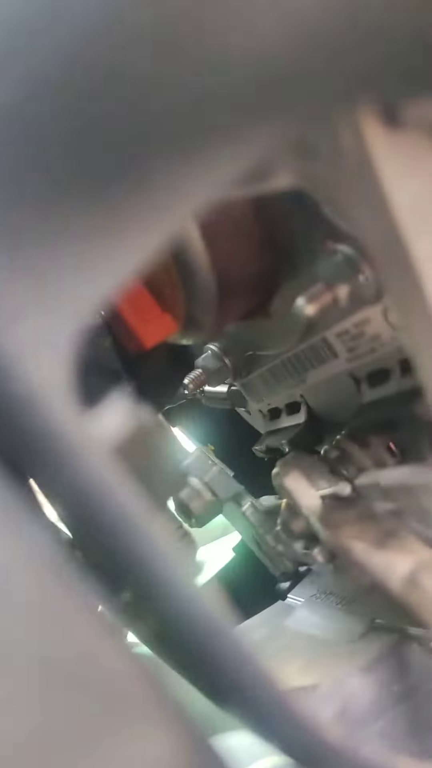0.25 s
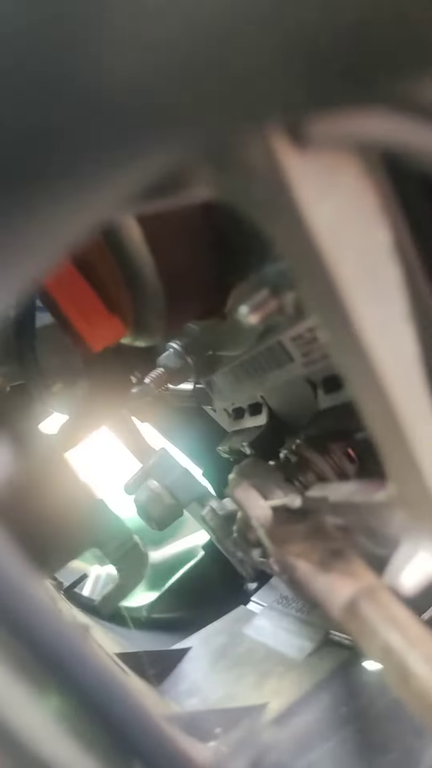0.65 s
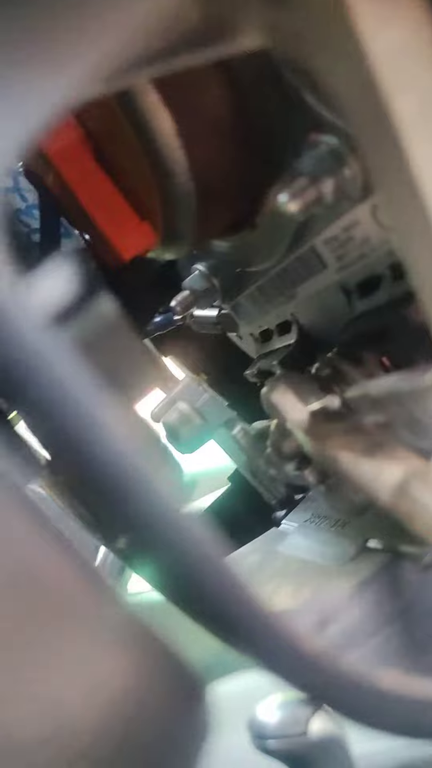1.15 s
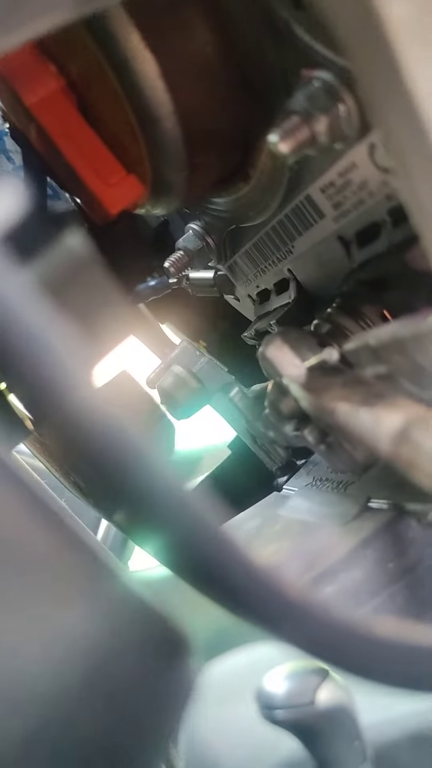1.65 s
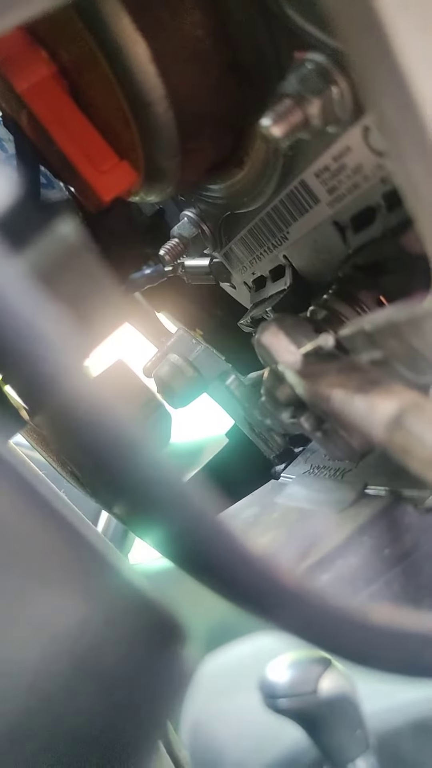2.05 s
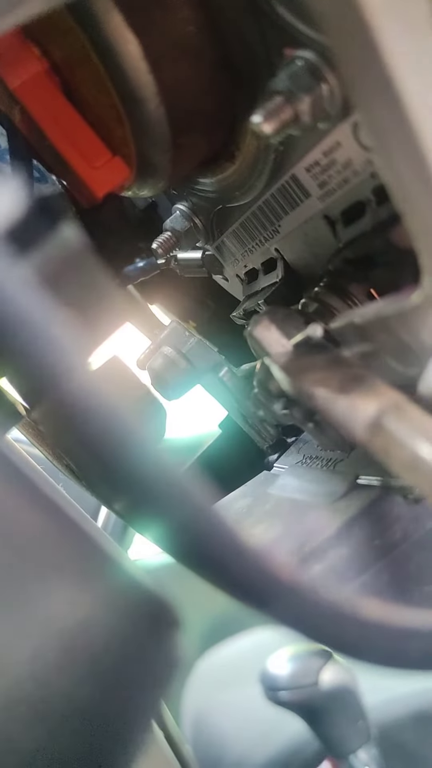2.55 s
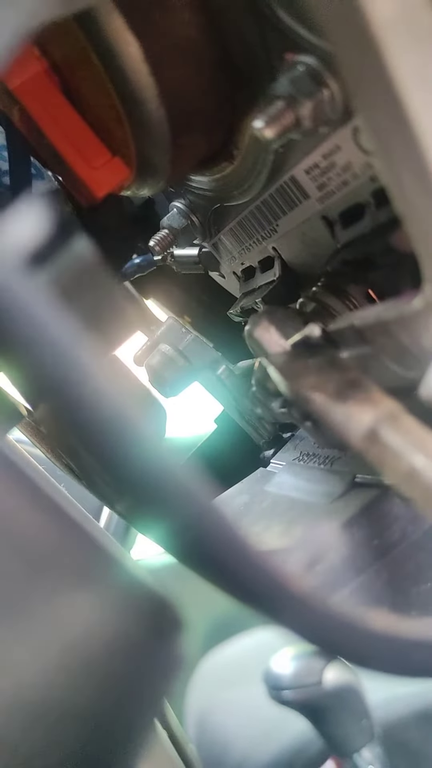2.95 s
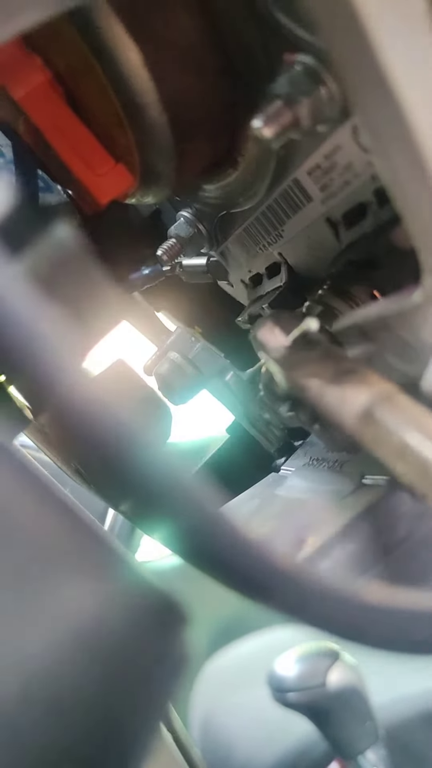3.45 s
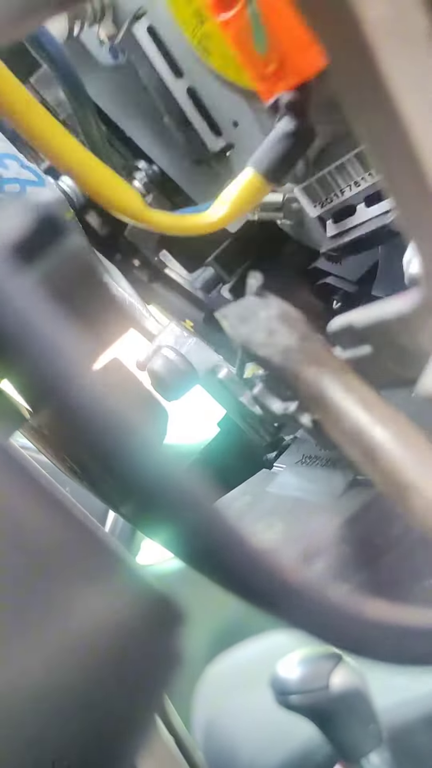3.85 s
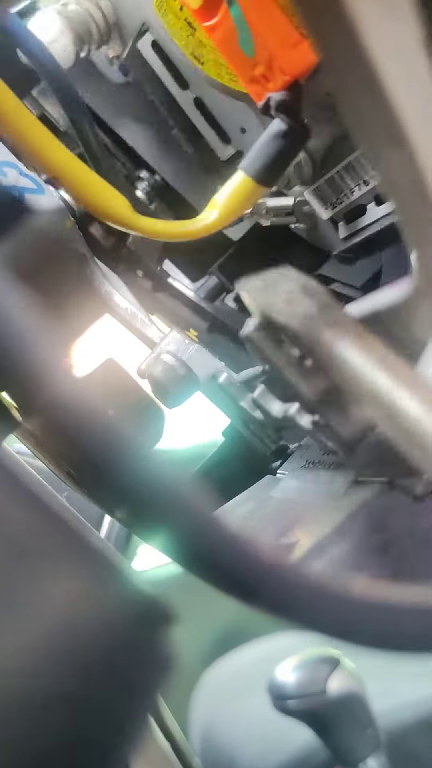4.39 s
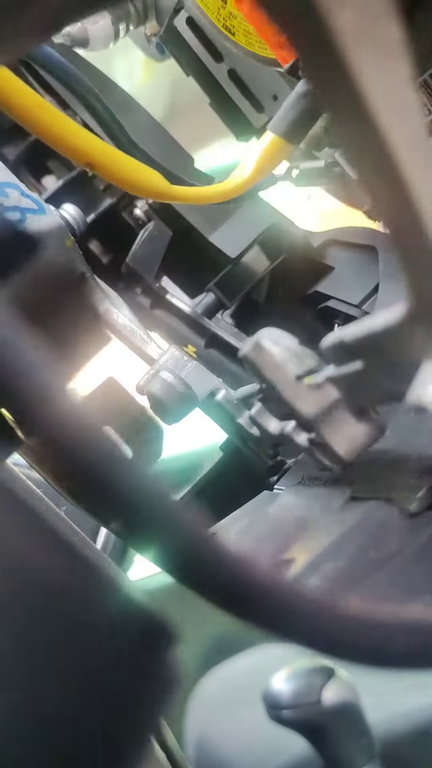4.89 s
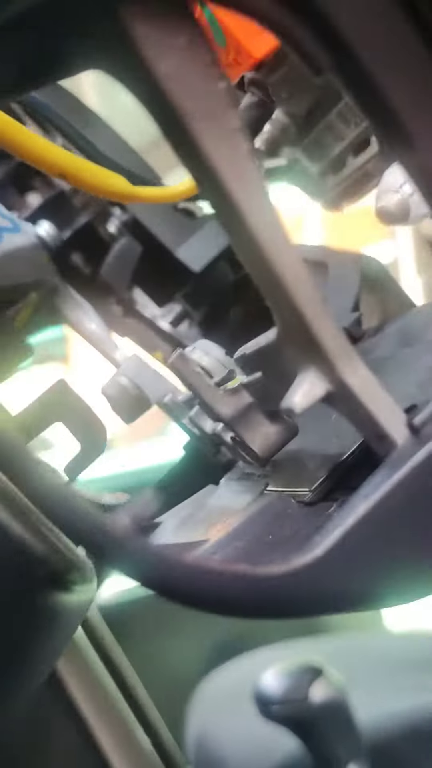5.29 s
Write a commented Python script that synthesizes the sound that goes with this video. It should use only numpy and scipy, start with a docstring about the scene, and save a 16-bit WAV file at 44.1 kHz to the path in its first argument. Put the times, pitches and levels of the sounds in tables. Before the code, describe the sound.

A screwdriver works at spring clips behind a dashboard, very near the microphone. The first half is sparse: handling rubs and taps, then delicate ticks over a quiet idle rumble. Later a knock, a loud hollow double pop with panel shudder, metallic scrapes, and the loudest event, a springy steel snap with rebound. Short chirps and a grainy, catching slide end it, in a dull cabin with very little echo.

```python
"""Car cabin, small and dead: a flat screwdriver pries at spring clips behind the dashboard, near a camera.
The blade ticks, levers one clip loose, scrapes along, snaps a second one free and is drawn out.
Contacts are blows and micro-slips ringing a part's resonances; slides are grainy friction noise.
An idling engine and a second low hum are sines; rumble, rush and hiss are shaped noise."""
import sys
import numpy as np
from scipy import signal
from scipy.fft import rfft, irfft, next_fast_len
from scipy.io import wavfile
from scipy.ndimage import uniform_filter1d, map_coordinates

SR = 44100
rng = np.random.default_rng(int(sys.argv[2]) if len(sys.argv) > 2 else 0)


def dump_mix(stems):
    """Bounce the given channels to the path in sys.argv[1] as a 16-bit WAV at rate SR."""
    frames = np.atleast_2d(stems).T  # one column per channel
    limited = np.clip(frames, -1, 1)  # hard clip at full scale
    pcm = np.round(limited * 32767).astype(np.int16)
    wavfile.write(sys.argv[1], SR, pcm)


N = 243696
TIME = np.arange(N) / SR

# In all contact tables, hardness adds treble and takes away body.
# lever gives way against the plastic trim: start_s, level_db, hardness_db
POPS = [(3.8629, -8, -0.94), (3.8695, -9, 0.2)]
# steel clip springs free and rebounds: start_s, level_db, hardness_db
SNAPS = [(4.4627, -3.5, -1), (4.4668, -9.5, 1.5), (4.4787, -8.5, 0.5)]
# friction spectrum of the sliding blade: freq_hz, relative_db (per Hz)
SCRAPE = [(80, 12), (300, 4), (900, 1.5), (1300, -4), (2000, -4.5), (3000, -8), (4500, -17.5),
          (8000, -16.5), (10000, -28), (16000, -37)]


def amp(db):
    """Decibels to gain."""
    return 10 ** (np.asarray(db) / 20)


def unit(x):
    """Scale to rms 1."""
    return x / np.sqrt(np.mean(x ** 2) + 1e-20)


def along(points, hz):
    """Interpolate (Hz, value) points on a log frequency axis."""
    f, v = np.transpose(points)
    return np.interp(np.log(hz + 1), np.log(f + 1), v)


def curves(rows):
    """One value per sample for each column after the time."""
    s, *cols = np.transpose(rows)
    return [np.interp(TIME, s, c) for c in cols]


def wobble(rate_hz):
    """A smooth random curve with rate_hz knots a second."""
    knots = rng.standard_normal(int(N * rate_hz / SR) + 4)
    return map_coordinates(knots, [TIME * rate_hz])


def filtered(x, response):
    """Filter x by a complex response of frequency."""
    m = next_fast_len(N + SR // 2)
    hz = np.fft.rfftfreq(m, 1 / SR)
    return irfft(rfft(x, m) * response(hz), m)[..., :N]


def causal(db):
    """The minimum-phase response with these gains: nothing sounds before its cause."""
    cepstrum = irfft(np.log(amp(db)))
    half = cepstrum.shape[-1] // 2
    cepstrum[..., 1:half] *= 2
    cepstrum[..., half + 1:] = 0
    return np.exp(rfft(cepstrum))


def noise(spectrum, apart):
    """Coloured stereo noise of rms 1; apart is the size of the side against the mid."""
    white = rng.standard_normal((2, N))
    mid, side = filtered(white, lambda hz: amp(along(spectrum, hz)))
    return unit(np.array([mid + apart * side, mid - apart * side]))


def swell(start_s, length_s):
    """A rounded pressure pulse."""
    progress = np.clip((TIME - start_s) / length_s, 0, 1)
    return np.sqrt(np.abs(np.sin(np.pi * progress))) * (TIME < start_s + length_s)


def add(out, start_s, sound):
    """Mix a sound in at start_s."""
    part = out[:, max(round(start_s * SR), 0):][:, :sound.shape[1]]
    part += sound[:, :part.shape[1]]


def ringing(modes, hz, damping):
    """Resonances at each port: their strengths change at random with the spot that is struck."""
    centre, width, db = np.transpose(modes)[:, :, None]
    loss = 1j * hz * width * damping
    shapes = loss / (centre * centre - hz * hz + loss)
    spot = amp(rng.normal(0, 3.6, (2, len(modes))))
    return spot @ (amp(db) * shapes)


def contacts(rows, modes, t60_s, pan_db, lean, ring_db, damping, rise_s, spike, rough_db,
             thud_db, knock_db, bright_db, top_db, bass_db):
    """Each contact is a sharp blow and a dying train of micro-slips that ring the part."""
    out, size = np.zeros((2, N)), 8192
    t, hz = np.arange(size) / SR, np.fft.rfftfreq(size, 1 / SR)
    grip = (1 - np.exp(-t / rise_s)) * amp(-60 * t / t60_s)
    for start_s, level_db, hardness_db in rows:
        lumps = unit(uniform_filter1d(rng.standard_normal(size), 30))
        slips = rng.standard_normal((2, size)) * grip * amp(rough_db * lumps)
        force = slips / np.linalg.norm(slips, axis=1, keepdims=True)
        force[:, 8] += spike  # the blow
        push = rfft(force)
        # long waves reach both ports alike, the right one a little later
        alike = 1 / (1 + (hz / 1400) ** 2)
        right = alike * push[0] + np.sqrt(1 - alike ** 2) * push[1]
        push[1] = right * np.exp(-2j * np.pi * hz * 0.00042)
        body = 1 + amp(ring_db) * ringing(modes, hz, damping)
        body /= np.sqrt(np.mean(np.abs(body[:, hz < SR / 8]) ** 2))
        # a harder contact gains treble and loses lean times as much thud and knock
        low = thud_db - lean * hardness_db
        mid = knock_db - lean * hardness_db
        high = bright_db + hardness_db
        colour = [(25, low + bass_db - 31), (100, low + bass_db), (220, low), (330, low),
                  (600, mid), (1100, mid), (1900, -1.4), (3200, 0.94), (5200, high), (8300, high),
                  (10000, high + top_db), (15000, high + top_db)]
        click = irfft(push * body * causal(along(colour, hz)))
        # undo the dilution of the force over the train's length
        gain = np.sqrt(t60_s * SR / np.log(1e6) / (1 + spike ** 2))
        add(out, start_s, click * amp(level_db) * gain)
    return out * amp([[pan_db / 2], [-pan_db / 2]])


def stutter(start_s, length_s, level_db, count):
    """Stick-slip: contacts at an uneven pace, each with its own strength and hardness."""
    times = start_s + length_s * (np.arange(count) + rng.uniform(size=count)) / count
    scatter_db = 1.8 * rng.standard_normal((count, 2))
    return [(s, level_db + louder, harder) for s, (louder, harder) in zip(times, scatter_db)]


def stroking(rows, spectrum, grain_db, lump_db):
    """Sliding friction catches on grain after grain, in lumps."""
    pressure = sum(amp(db) * swell(s, length) for s, length, db in rows)
    catching = amp(grain_db * wobble(450) + lump_db * wobble(90))
    return pressure * unit(noise(spectrum, apart=0.99) * catching)


def engine():
    """The idle's firing rate holds, then sinks; its harmonics beat against a second low hum."""
    # level of the idle, before its random waver: time_s, level_db
    idle_level = [(0, -56.5), (1.5, -50), (1.9, -49), (2.4, -43), (3.03, -53), (3.3, -42), (3.75, -43),
                  (4.1, -39), (5.53, -39.5)]
    # harmonics of the firing rate: multiple, relative_db
    orders = [(1, 1.5), (2, -12.5), (3, -19), (4, -22)]
    # second hum: time_s, pitch_hz
    drone_pitch = [(0, 74.5), (1.1, 74), (1.8, 69), (3.7, 69.8), (4.8, 62), (5.53, 63.5)]
    # second hum, before its random waver: time_s, level_db
    drone_level = [(0, -52), (1.6, -57.5), (2.1, -43.5), (2.9, -49.5), (4.0, -39), (4.8, -53.5),
                   (5.53, -34)]
    idle_hz, sag_from_s, sag_hz_per_s = 50.53, 3.0, 2.2
    firing_hz = idle_hz - sag_hz_per_s * np.maximum(TIME - sag_from_s, 0)
    phase = 2 * np.pi * np.cumsum(firing_hz * (1 + 0.01087 * wobble(11))) / SR
    idle_db = curves(idle_level)[0] + 1.4 * wobble(7)
    idle = 0
    for k, db in orders:
        level = amp(idle_db + db + 0.47 * wobble(5.17))
        idle = idle + level * np.sin(k * phase + rng.uniform(0, 2 * np.pi))
    (drone_hz,), (drone_db,) = curves(drone_pitch), curves(drone_level)
    drone = amp(drone_db + wobble(3.42)) * np.sin(2 * np.pi * np.cumsum(drone_hz) / SR)
    return np.sqrt(2) * (idle + drone)  # levels are rms


def ambience():
    """Slowly wavering noise bands: rumble and a soft rush, over the microphones' own white hiss."""
    # cabin noise, before the offsets below: time_s, body_db, hiss_db
    air = [(0.0, -52.5, -62), (0.21, -56.5, -65), (1.72, -57, -66.5), (3.42, -54.5, -63.5),
           (4.89, -51, -57), (5.53, -50, -58.5)]
    # spectra: freq_hz, relative_db (per Hz)
    rumble_spectrum, body_spectrum, hiss_spectrum = [(15, 3.5), (30, -3), (55, -5), (105, 3), (150, -15.5),
                                                     (400, -35), (2000, -100)], [(40, 3.5), (130, -2), (300, 2),
                                                                     (480, -8), (750, -5.5), (1200, -17),
                                                                     (2000, -63), (6000, -51)], [(500, -2.5), (1300, -3),
                                                                                   (2400, -1.5),
                                                                                   (3800, -11), (6500, -18),
                                                                                   (8200, -10),
                                                                                   (10000, -26),
                                                                                   (16000, -33)]
    body_db, hiss_db = curves(air)
    rumble = amp(body_db + 4 + 3 * wobble(1.93)) * noise(rumble_spectrum, apart=0.28)
    body = amp(body_db + 0.32 + 0.75 * wobble(17)) * noise(body_spectrum, apart=0.49)
    hiss = amp(hiss_db + 0.75 + 0.71 * wobble(4.02)) * noise(hiss_spectrum, apart=1.0)
    mic_hiss = amp(-69) * rng.standard_normal((2, N))
    return rumble + body + hiss + mic_hiss


def blade_ticks():
    """Light contacts ring the blade against its clip."""
    # start_s, level_db, hardness_db
    ticks = [(0.2089, -40, 1), (0.6893, -44, -4), (1.0377, -30.5, -5), (1.0851, -29.5, 2),
             (1.1668, -42, -6), (1.7904, -58, -8), (2.3338, -45.5, 3), (2.6115, -33, -3),
             (2.6544, -44.5, 1), (3.5137, -44, 3), (3.6039, -34, -9.5), (3.696, -39.5, 11.5),
             (3.7174, -38, 13.5)]
    # blade resonances: freq_hz, width_hz (before damping), relative_db
    blade = [(717, 27, -4), (1067, 78, 2), (1690, 110, 4.5), (2740, 220, -7.5), (3950, 84, -34),
             (4800, 210, -12), (5220, 280, -27), (7570, 330, -1)]
    return contacts(ticks, blade, t60_s=0.023, pan_db=4.5, lean=0.68, ring_db=1.5, damping=1.2,
                    rise_s=0.0011, spike=0.7, rough_db=0.66,
                    thud_db=-3, knock_db=2.5, bright_db=-11.5, top_db=-9.5, bass_db=-3)


def handling():
    """Fingers rub the camera as soft friction, and dry taps ring its case, nearer to the left port."""
    # finger shifts: start_s, length_s, level_db
    shifts = [(.4375, 0.0054, -37.5), (0.443, 0.073, -46.5), (0.571, 0.051, -52), (0.791, 0.011, -49),
              (0.898, 0.014, -49)]
    # skin friction: freq_hz, relative_db (per Hz)
    skin = [(60, -23), (200, -6.5), (330, -1.5), (600, -9), (900, -25), (2500, -55), (9000, -70)]
    # dry knocks: start_s, level_db, hardness_db
    taps = [(0.6236, -23, -0.44), (0.6524, -14.5, 0)]
    # camera case resonances: freq_hz, width_hz (before damping), relative_db
    case = [(334, 230, -10), (830, 440, -0.5), (3030, 600, 5), (7800, 630, -19)]
    rubs = stroking(shifts, skin, grain_db=1, lump_db=1) * amp([[3], [-4]])
    return rubs + contacts(taps, case, t60_s=0.0043, pan_db=15.0, lean=1.2, ring_db=-1, damping=1,
                           rise_s=0.00039, spike=0.88, rough_db=2.2,
                           thud_db=11, knock_db=1, bright_db=-10.5, top_db=-17, bass_db=-2)


def seating_knock():
    """The blade seats itself behind the plastic housing, whose low modes ring."""
    # start_s, level_db, hardness_db
    knocks = [(3.3844, -19.5, 0)]
    # housing resonances: freq_hz, width_hz (before damping), relative_db
    housing = [(124.3, 46, -1), (207, 47, -1.5), (295, 69, 0.5), (1800, 130, 10), (2060, 99, -8),
               (3280, 170, -17)]
    return contacts(knocks, housing, t60_s=0.029, pan_db=8.0, lean=1, ring_db=7.5, damping=1.5,
                    rise_s=0.0005, spike=0.3, rough_db=1.5,
                    thud_db=9.5, knock_db=6, bright_db=-10.5, top_db=-10.5, bass_db=6)


def trim_pops():
    """The lever gives way and rings the plastic trim."""
    # trim resonances: freq_hz, width_hz (before damping), relative_db
    trim = [(280, 13, 1), (553, 28, -8), (733, 23, 11), (783, 31, 11.5), (970, 88, 2), (1070, 31, 1),
            (1780, 14, -11), (1900, 14, -15), (2780, 43, 8), (4640, 150, -4)]
    return contacts(POPS, trim, t60_s=0.035, pan_db=2.5, lean=4.5, ring_db=3.0, damping=1.4,
                    rise_s=0.00064, spike=0.47, rough_db=2.8,
                    thud_db=6, knock_db=0.0, bright_db=-6.5, top_db=-14, bass_db=5)


def trim_shudder(level_db=-19, panel_hz=103, sway_hz=58, t60_s=.22):
    """The whole panel swings in two decaying modes when the lever gives way."""
    t = np.maximum(TIME - POPS[0][0], 0)
    fade = amp(level_db - 60 * t / t60_s)
    return fade * (np.sin(2 * np.pi * panel_hz * t) + .5 * np.sin(2 * np.pi * sway_hz * t))


def blade_strokes():
    """The blade slides along as grainy friction."""
    # start_s, length_s, level_db
    strokes = [(3.868, 0.11, -37), (3.99, 0.128, -40), (4.44, 0.037, -42), (4.575, .115, -52.5),
               (4.694, 0.059, -45.5)]
    return stroking(strokes, SCRAPE, grain_db=1, lump_db=3.0)


def blade_skids():
    """The blade skids over edges, with a run of stick-slips, and rings the steel bracket."""
    # start_s, level_db, hardness_db
    skids = [(3.8989, -19, 3), (3.9316, -26, 2), (3.9748, -20.5, 9.5), (4.0155, -26.5, -5),
             (4.0368, -15.5, -1), (4.0733, -22.5, 5.5), (4.0924, -30, -8), (4.124, -35.5, 3.5),
             (4.333, -35, -4)]
    # bracket resonances: freq_hz, width_hz (before damping), relative_db
    bracket = [(520, 53, 4.5), (790, 19, -6), (1176, 140, -4), (1620, 93, -2.5), (1806, 56, 3),
               (2017, 17, -12), (2940, 50, -4), (4840, 120, -10), (7330, 140, -4), (8700, 320, 2)]
    run = stutter(start_s=4.035, length_s=.055, level_db=-36, count=5)
    return contacts(skids + run, bracket, t60_s=0.035, pan_db=2.5, lean=1.0, ring_db=4, damping=1.24,
                    rise_s=0.0018, spike=0.23, rough_db=4.6,
                    thud_db=-0.5, knock_db=-2, bright_db=-11.0, top_db=-14, bass_db=7)


def clip_snaps():
    """The steel clip springs free and rebounds, ringing brightly."""
    # clip resonances: freq_hz, width_hz (before damping), relative_db
    spring = [(1330, 15, -5), (2270, 79, 10), (2780, 93, 2), (3140, 63, -4), (4350, 140, -7),
              (4810, 230, -1.5), (5450, 170, -13), (6750, 56, -4.5), (7870, 290, 2), (8470, 130.3, -11),
              (14300, 170, -2)]
    return contacts(SNAPS, spring, t60_s=.015, pan_db=-2.0, lean=0.36, ring_db=6, damping=1.9,
                    rise_s=0.0011, spike=0.37, rough_db=1.7,
                    thud_db=-6.5, knock_db=0.0, bright_db=2.5, top_db=-8.5, bass_db=-14)


def port_thump(level_db=-4.5, decay_s=0.037, swing_hz=7.1, rise_s=0.0019):
    """The snap jolts the left microphone, far less the right: a swing out and a damped recovery."""
    t = np.maximum(TIME - SNAPS[0][0] - .001, 0)
    swing = (1 - np.exp(-t / rise_s)) * np.exp(-t / decay_s) * np.cos(2 * np.pi * swing_hz * t)
    return -amp([[level_db], [level_db - 21]]) * swing


def clip_settling():
    """The freed clip chatters to rest as short bursts of friction noise."""
    # start_s, length_s, level_db
    bursts = [(4.484, 0.019, -33.5), (4.49, 0.047, -44.5)]
    # freq_hz, relative_db (per Hz)
    chatter = [(300, -2.5), (900, -4.5), (1350, 1.5), (1800, -8), (2600, 0), (3500, -14), (5000, -13),
               (8000, -18), (10000, -32), (16000, -36)]
    return stroking(bursts, chatter, grain_db=-0.5, lump_db=0.5)


def squeaks():
    """Steel sticks on plastic: brief tones of jittering pitch, with friction grit."""
    # start_s, length_s, pitch_hz (before jitter), level_db
    rows = [(4.697, 0.0085, 2370, -42), (4.71, 0.011, 2357, -34.5), (4.723, 0.011, 2350, -36.5),
            (4.77, 0.013, 1480, -42.5)]
    out = np.zeros((2, N))
    grit = 0.68 * noise(SCRAPE, apart=0.99)
    for start_s, length_s, pitch_hz, level_db in rows:
        phase = 2 * np.pi * np.cumsum(pitch_hz * (1 + .03 * wobble(900))) / SR
        tone = np.sin(phase + np.array([[0], [1]]))  # right port 1 rad ahead
        out += amp(level_db) * swell(start_s, length_s) * (tone + grit)
    return out


def shaft_pull():
    """The shaft slides out past the trim as coarse-grained friction."""
    # start_s, length_s, level_db
    pulls = [(4.828, 0.155, -42.5), (4.856, 0.027, -45.5), (4.888, 0.061, -44)]
    # freq_hz, relative_db (per Hz)
    rasp = [(120, -18), (240, 12.5), (500, 4), (800, 7.5), (1150, -7), (1550, 4.5), (2100, -13),
            (3200, -14), (4700, -3.5), (6300, -14), (7800, -6.5), (10000, -24), (16000, -37)]
    return stroking(pulls, rasp, grain_db=6, lump_db=2.0)


def shaft_slips():
    """The shaft stutters and catches hard on the trim on its way out."""
    # hard catches: start_s, level_db, hardness_db
    catches = [(4.8888, -26, 0.018), (4.9187, -27, 0), (4.9691, -34, 0)]
    # shaft resonances: freq_hz, width_hz (before damping), relative_db
    shaft = [(1520, 61, -2), (2340, 44, -6), (2710, 44, 2.5), (3770, 110, -11), (4500, 150, -1.5),
             (7640, 85, -2)]
    run = stutter(start_s=4.858, length_s=.112, level_db=-37, count=10)
    return contacts(catches + run, shaft, t60_s=.03, pan_db=6.5, lean=0.91, ring_db=11.5, damping=0.87,
                    rise_s=0.0006, spike=0.2, rough_db=5.4,
                    thud_db=21, knock_db=11, bright_db=-13.0, top_db=-12, bass_db=-22)


def cabin(x):
    """The upholstered cabin answers with a short, dull tail of decaying noise."""
    # freq_hz, t60_s
    decay = [(100, 0.61), (700, 0.14), (2500, 0.07), (8000, 0.058), (15000, 0.013)]
    hz, t, z = signal.stft(rng.standard_normal((2, SR // 3)), SR, nperseg=256)
    fade = amp(-60 * t / along(decay, hz)[:, None])
    tail = signal.istft(z * fade, SR, nperseg=256)[1]
    tail = np.pad(tail / np.linalg.norm(tail[0]), ((0, 0), (130, 0)))  # 130 samples of pre-delay
    return signal.fftconvolve(x, tail, axes=1)[:, :N]


def scene():
    """Tool work in the cabin, handling and the steady background."""
    work = blade_ticks() + seating_knock() + trim_pops() + blade_strokes() + blade_skids()
    work += clip_snaps() + clip_settling() + squeaks() + shaft_pull() + shaft_slips()
    room = amp(-17.5) * cabin(work)
    return engine() + ambience() + work + room + handling() + trim_shudder() + port_thump()


def record(dry):
    """Each port colours the sound its own way; peaks are rounded off and the top is cut."""
    # colour of the two microphone ports: freq_hz, left_db, right_db
    ports = np.array([(97, -1, -1), (296, 2.5, -1), (1060, 5, 2.5), (1740, 4, 5), (2960, -3.5, 4),
                      (4630, -1, 4.5), (6970, 2, 2.5), (7600, 6.5, -14), (8670, -1, -7.5), (10500, 0, -1),
                      (14500, -2, 0)])
    left, right = ports[:, [0, 1]], ports[:, [0, 2]]
    heard = filtered(dry, lambda hz: causal(np.array([along(left, hz), along(right, hz)])))
    heard = heard / (1 + np.abs(heard) ** 6) ** (1 / 6)
    top_hz, slope_hz = 16000, 300
    return filtered(heard, lambda hz: np.clip(.5 + (top_hz - hz) / slope_hz, 0, 1))


dry = scene()
out = record(dry)
dump_mix(out)
```